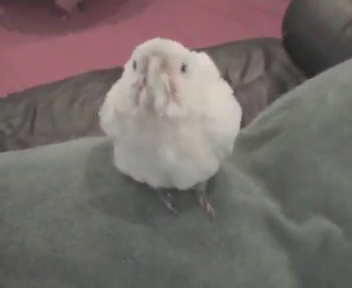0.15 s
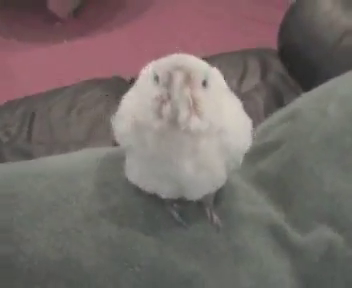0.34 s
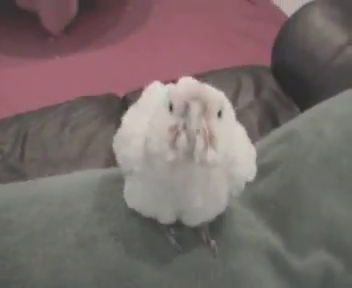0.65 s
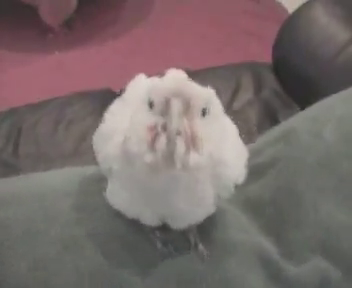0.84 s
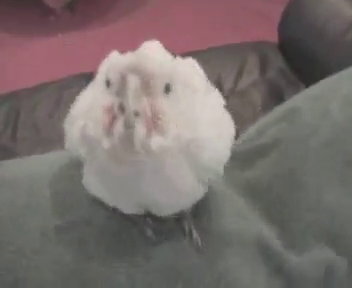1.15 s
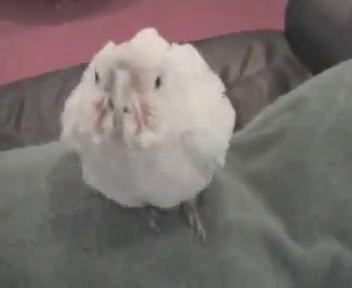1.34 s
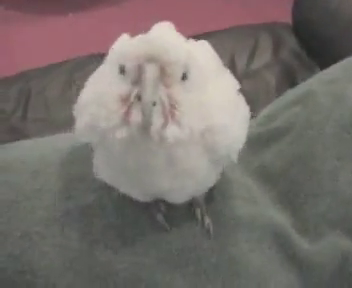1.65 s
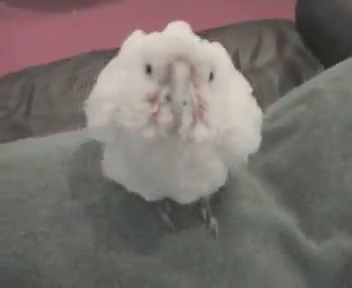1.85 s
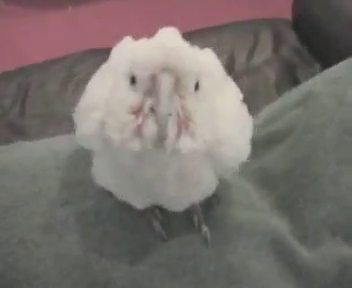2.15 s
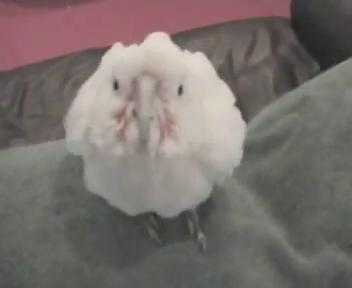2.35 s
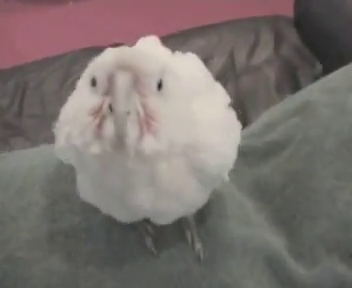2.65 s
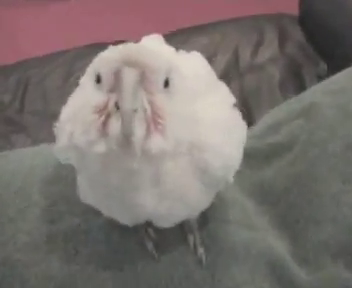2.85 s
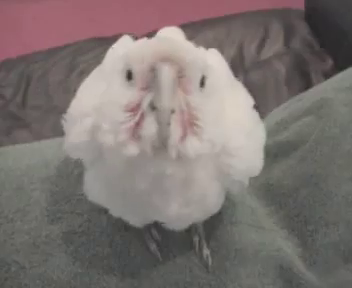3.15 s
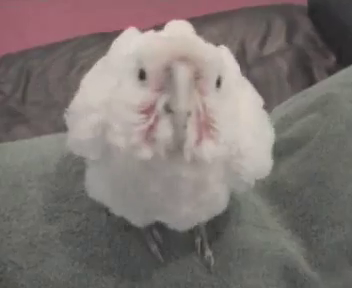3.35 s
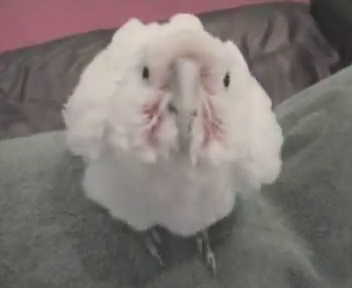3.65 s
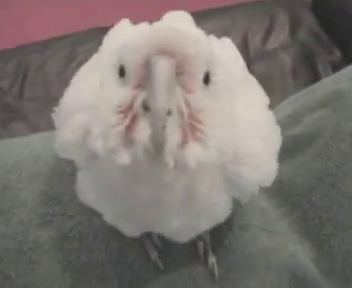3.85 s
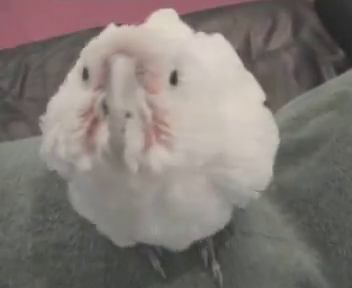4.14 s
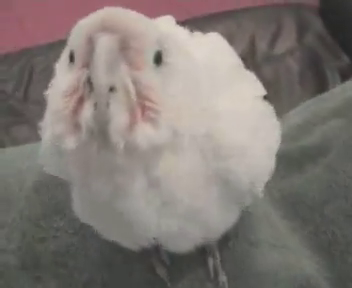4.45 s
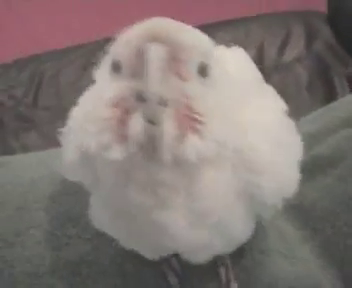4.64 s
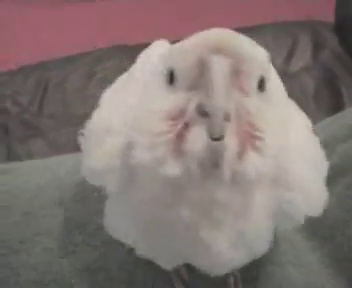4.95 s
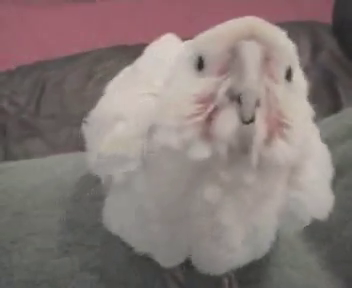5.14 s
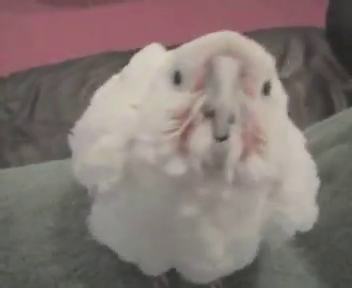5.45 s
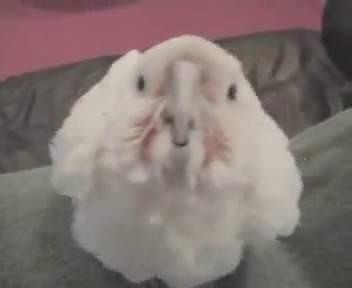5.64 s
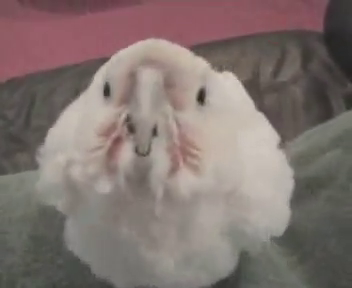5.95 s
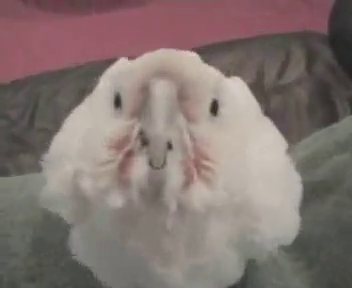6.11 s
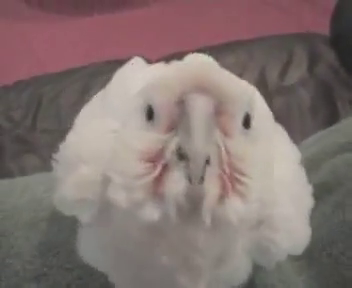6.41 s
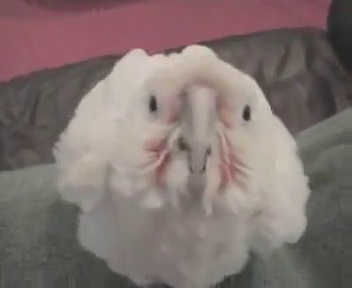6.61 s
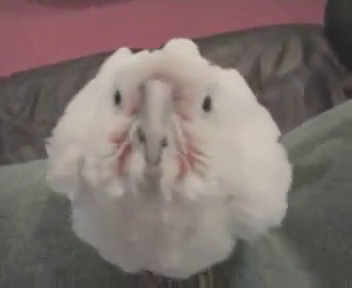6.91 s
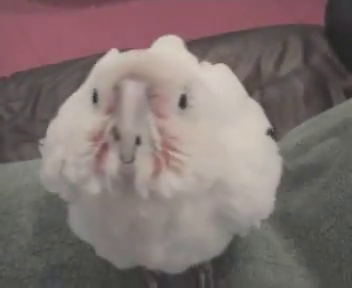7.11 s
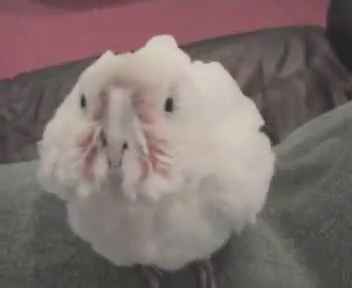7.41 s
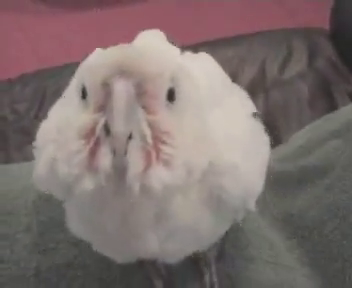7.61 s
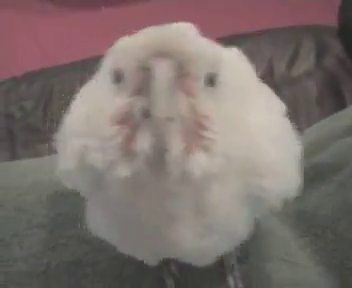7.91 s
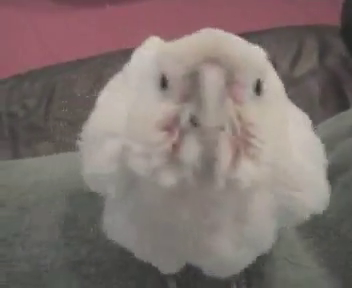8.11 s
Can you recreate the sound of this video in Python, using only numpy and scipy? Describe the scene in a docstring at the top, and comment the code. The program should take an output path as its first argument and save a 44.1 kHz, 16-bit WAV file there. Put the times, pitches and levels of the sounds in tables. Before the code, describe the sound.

Four raspy, grating parrot calls, growing louder and longer, with short squeaks at their edges, in a soft quiet room with machine whirr.

```python
"""A young cockatoo begs in harsh rasps close to a tape camcorder in a soft, quiet room. Each rasp is a train of
sharp syrinx pulses filtered by windpipe and beak; it sputters, stalls, and starts or ends in a squeak of
clean partials. Under it: motor noise and gear tones, ticks of a head drum, a very high whine (sines),
dull knocks on the casing (decaying sines) and a faint room tail (decaying noise)."""
import sys
import numpy as np
from scipy import signal
from scipy.fft import rfft, irfft, next_fast_len
from scipy.io import wavfile
from scipy.ndimage import uniform_filter1d, map_coordinates

SR = 44100
rng = np.random.default_rng(int(sys.argv[2]) if len(sys.argv) > 2 else 0)


def pcm_store(signal):
    """Save signal as 16-bit PCM."""
    levels = np.round(np.clip(np.atleast_2d(signal), -1, 1) * 32767)
    wavfile.write(sys.argv[1], SR, levels.astype(np.int16).T)


N = 364707


def amp(db):
    """Amplitude of a level in dB."""
    return 10 ** (np.asarray(db) / 20)


def unit(x):
    """x scaled to RMS 1."""
    return x / np.sqrt(np.mean(x ** 2) + 1e-20)


def along(points, hz):
    """(frequency, value) points interpolated on a log frequency axis."""
    f, v = np.transpose(points)
    return np.interp(np.log(hz + 1), np.log(f + 1), v)


def read(rows, t):
    """Each column after the time, interpolated at the times t."""
    s, *cols = np.transpose(rows)
    return [np.interp(t, s, c) for c in cols]


def wobble(rate_hz):
    """Smooth random curve with rate_hz random knots a second."""
    return map_coordinates(rng.standard_normal(int(N * rate_hz / SR) + 4), [np.arange(N) * rate_hz / SR])


def filtered(x, response):
    """x times a zero-phase response of frequency."""
    m = next_fast_len(N + 8192)
    return irfft(rfft(x, m) * response(np.fft.rfftfreq(m, 1 / SR)), m)[..., :N]


def room(x):
    """Soft room: cushions leave only a short tail of decaying noise."""
    t60_s, delay_samples = .29, 100
    t = np.arange(SR // 4) / SR
    tail = rng.standard_normal(len(t)) * amp(-60 * t / t60_s)
    return signal.fftconvolve(np.pad(x, (delay_samples, 0)), tail / np.linalg.norm(tail))[:N]


# motor noise spectrum, common part: (frequency [Hz], relative density [dB])
HUM_MID = [(15, -50), (25, -12), (60, -4), (213, -2.5), (363, -6), (529, -7.5), (879, -5.5), (1210, -3.5),
           (1630, -16.5), (1960, -6.5), (2430, -14), (3260, -11.5), (3540, -13), (4380, -8.5), (6370, -13),
           (15000, -30)]
# motor noise spectrum, left-right part: (frequency [Hz], relative density [dB])
HUM_SIDE = [(15, -48), (25, -14), (118, 0.5), (811, -3), (952, -1.5), (4040, -17.5), (4500, -26),
            (8780, -3.5), (10600, -16), (15000, -19.5)]
# whirr: (time [s], level before flutter [dB])
WHIRR = [(0, -57.5), (.15, -68), (1.4, -63), (2.4, -61.5), (3.6, -64.5), (7.55, -67.5), (7.7, -59.5),
         (8.27, -64.5)]
# narrow hiss near 1.4 kHz that fades early: (time [s], level [dB])
DRONE = [(0, -60), (.25, -62.5), (.5, -72), (8.27, -76)]


def motor_hiss():
    """Motor noise as mid and side: shaped broadband hiss, a fluttering whirr band and a narrow drone."""
    noise = rng.standard_normal((4, N))
    t = np.arange(N) / SR
    hum = amp(-59) * unit(filtered(noise[0], lambda hz: amp(along(HUM_MID, hz))))
    side = amp(-63) * unit(filtered(noise[1], lambda hz: amp(along(HUM_SIDE, hz))))
    whirr = unit(filtered(noise[2], lambda hz: 1 / (1 + ((hz - 4650) / 350) ** 2)))
    drone = unit(filtered(noise[3], lambda hz: 1 / (1 + ((hz - 1400) / 150) ** 2)))
    mid = hum * amp(2.4 * wobble(3.3))
    mid += whirr * amp(read(WHIRR, t)[0] + 2.1 * wobble(12))
    mid += drone * amp(read(DRONE, t)[0])
    return mid, side


# gear tones: (frequency [Hz], width of wander [Hz], level before flicker [dB])
GEARS = [(102, 10, -77), (1258, 6, -72), (3371, 5, -78), (4320, 50, -70), (4496, 10, -66), (5035, 40, -73),
         (5240, 20, -75)]


def gear_tones():
    """Sines that wander in pitch and flicker in level."""
    tones = np.zeros(N)
    for hz, width_hz, db in GEARS:
        flicker = amp(db + 3 * wobble(9))
        phase = 2 * np.pi * np.cumsum(hz + width_hz / 2 * wobble(28)) / SR
        tones += np.sqrt(2) * flicker * np.sin(phase)
    return tones


TICK_HZ, FIRST_TICK_S = 59.94, .018


def half_turns(t):
    """Drum position in half turns."""
    return (t - FIRST_TICK_S) * TICK_HZ


# ticks of the drum's two heads: (time [s], louder head before scatter [dB], first over second [dB])
DRUM = [(.3, -52, 0), (1.5, -50, 9), (2, -53, 17), (3.7, -50, -17), (5.9, -50, 7), (7.6, -52.5, 12),
        (8.2, -51, 9)]


def drum_ticks():
    """One head ticks each half turn: a short decaying ring, the heads unequal."""
    t60_s, rise_s, ring_hz, scatter_db = .019, .00037, 1935, 2.5
    t = np.arange(N) / SR
    turn = half_turns(t)
    since = turn % 1 / TICK_HZ
    head = np.floor(turn).astype(int)
    scatter = scatter_db * rng.standard_normal(head[-1] + 2)[head + 1]
    loud_db, lead_db = read(DRUM, t)
    strength = loud_db + np.minimum((-1.) ** head * lead_db, 0) + scatter
    envelope = amp(strength - 60 * since / t60_s) * (1 - np.exp(-since / rise_s))
    return envelope * np.sin(2 * np.pi * ring_hz * since)


# whine: (time [s], level [dB], left over right [dB])
WHINE = [(0.0, -76, -1), (0.23, -68, -5.5), (0.78, -67, 3.5), (1.01, -72, -11.5), (1.15, -81, 6.0),
         (2.02, -69, 10.0), (2.42, -78, 8.0), (2.58, -76, -9.0), (2.85, -65, 4.0), (3.45, -87, 0.0),
         (3.59, -69, 8.5), (4.08, -69, -20), (5.34, -83, 5.5), (6.2, -64, -0.5), (6.79, -75, -1.0),
         (7.67, -62, -3.0), (8.04, -73, -8.5), (8.27, -83, 4.5)]


def whine():
    """High sine, wavering unlike left and right, throbbing once each half turn of the drum."""
    whine_hz, port_phase_rad = 15673, np.array([[.6], [-.6]])
    t = np.arange(N) / SR
    level_db, pan_db = read(WHINE, t)
    level = amp(level_db + np.array([pan_db, -pan_db]) / 2)
    throb = 1 + .2 * np.cos(2 * np.pi * half_turns(t))
    return np.sqrt(2) * level * throb * np.sin(2 * np.pi * whine_hz * t + port_phase_rad)


def camcorder():
    """The machine's own noise, motors, gears and drum ticks in the middle and hiss in stereo, plus a high
    whine."""
    mid, side = motor_hiss()
    mid = mid + gear_tones() + drum_ticks()
    return np.array([mid + side, mid - side]) + whine()


# the hand shifts on the casing: (time [s], level before side gain [dB], frequency [Hz])
THUMPS = [(0.015, -48, 300), (0.062, -42.5, 295), (0.64, -32.5, 305), (3.264, -40, 298),
          (7.958, -41.5, 298)]


def thumps():
    """Dull knocks through the casing: decaying sines, opposite in polarity left and right."""
    t60_s, side_gain = .025, np.array([[2.5], [-2.5]])
    out, t = np.zeros(N + SR), np.arange(SR // 20) / SR
    for s, db, hz in THUMPS:
        out[round(s * SR):][:len(t)] += amp(db - 60 * t / t60_s) * np.sin(2 * np.pi * hz * t)
    return out[:N] * side_gain


# clean squeaks: (time at inner end, at or nearer a rasp [s], time at free end [s], frequency at inner end [Hz],
# at free end [Hz], levels at inner end before fades: first partial [dB], second [dB], third [dB])
SQUEAKS = [(.31, .264, 890, 740, -50, -57, -62), (1.255, 1.35, 1058, 1090, -45.5, -52, -47),
           (2.55, 2.526, 1340, 1360, -48, -50, -56), (3.435, 3.498, 1212, 1185, -45, -42.5, -39.5),
           (4.344, 4.236, 1340, 960, -41, -47, -50), (5.752, 5.822, 1090, 1068, -41, -42.5, -36),
           (6.427, 6.396, 1070, 820, -39, -43, -45), (7.504, 7.535, 1085, 990, -43, -45, -46)]
# higher partials re the third: (frequency [Hz], level [dB])
UPPER = [(3500, -16), (4300, -14), (4800, -7), (5400, -14), (6200, -28), (6750, -9), (7200, -26)]


def squeaks():
    """Membranes swing freely: clean partials; the windpipe picks among those above the third."""
    bend = 2.2  # curvature of the glide
    fade_db, fade_s, settle_s = 18, .015, .005
    thin_db_per_s, lead_share = [65, 190, 320], .35  # a squeak leading into a rasp thins by this share
    out = np.zeros(N)
    for joined, free, joined_hz, free_hz, *levels in SQUEAKS:
        i = np.arange(int(min(joined, free) * SR), int(max(joined, free) * SR))
        t = i / SR
        away = np.clip((t - joined) / (free - joined), 0, 1)
        hz = joined_hz + (free_hz - joined_hz) * away ** bend
        fade = fade_db * np.clip(1 - np.abs(t - free) / fade_s, 0, 1)
        apart = np.abs(t - joined)
        share = lead_share if free < joined else 1
        db = [level - thin * apart * share - fade for level, thin in zip(levels, thin_db_per_s)]
        # overtones settle in after a rasp
        settle = fade_db * np.clip(1 - apart / settle_s, 0, 1) * (free > joined)
        db[1:] = [v - settle for v in db[1:]]
        db += [db[2] + along(UPPER, k * hz) for k in range(4, 6)]
        phase = 2 * np.pi * np.cumsum(hz) / SR
        partials = sum(amp(v) * np.sin((k + 1) * phase) for k, v in enumerate(db))
        out[i] = np.sqrt(2) * signal.windows.tukey(len(i), .1) * partials
    return out


# airway resonances, beak shut, before stretch and lift: (frequency [Hz], width [Hz], relative level [dB])
SHUT = [(800, 800, -11), (1700, 540, -2), (2430, 520, -13), (3700, 510, -13.5), (4450, 320, -5),
        (6370, 710, -16), (7260, 465, 7)]
# airway resonances, beak ajar, before stretch: (frequency [Hz], width [Hz], relative level [dB])
OPEN = [(730, 990, -12), (1700, 450, -6.5), (2460, 427, 2), (3590, 880, -4), (4973, 320, 2),
        (6600, 1300, -4), (7800, 360, -18), (10500, 450, 3), (13200, 450, -12)]
# airway resonances, beak wide, before stretch: (frequency [Hz], width [Hz], relative level [dB])
WIDE = [(810, 890, -7.5), (1650, 900, -11.5), (2702, 520, 3), (3730, 730, -2), (4946, 380, -2),
        (6460, 900, -15.5), (7650, 730, -10), (10300, 540, -15.5), (13300, 280, -13.5)]
# spectrum of one syrinx pulse: (frequency [Hz], relative level [dB])
PULSE = [(60, -35), (250, -9), (500, -1.5), (1000, 0.5), (1300, -5.5), (1600, 0), (5300, 3.5), (6500, -11),
         (9000, -24.5), (16000, -14)]


def tract(beak, stretch=1, size=2048):
    """Causal airway answer, energy 1, to one pulse. The mouth is a side cavity: its notch climbs as the beak
    parts, and below the notch the airway already sounds open."""
    f = np.fft.rfftfreq(size, 1 / SR)

    def resonances(modes, lift=1):
        return sum(amp(2 * db) / (1 + (2 * (f - c * stretch * lift) / w) ** 2) ** 1.16 for c, w, db in modes)

    shut, ajar, wide = resonances(SHUT, 1 + .12 * beak), resonances(OPEN), resonances(WIDE)
    ajar = ajar * (1 - .82 / (1 + ((f - 3500 * stretch) / 600) ** 2))  # hollow between the two main bands
    notch_hz = 3050 * 2.25 ** beak
    below = 1 / (1 + (f / notch_hz) ** 16)
    opened = ajar + max(beak - 1, 0) * (wide - ajar)
    power = below * opened + (1 - below) * shut * amp(-40 * beak)
    power *= 1 - .985 / (1 + ((f - notch_hz) / (.12 * notch_hz)) ** 2)
    # minimum phase by folding the cepstrum
    cep = irfft(np.log(power) / 2 + np.log(amp(along(PULSE, f))))
    cep[1:size // 2] *= 2
    cep[size // 2 + 1:] = 0
    h = irfft(np.exp(rfft(cep)))[:size // 2]
    return h / np.linalg.norm(h)


# lone syrinx pulses: (time [s], peak level [dB])
TICKS = [(0.2665, -33.5), (0.3317, -40), (0.341, -36), (0.3655, -29), (2.4943, -27.5), (2.5017, -39),
         (3.8608, -35.5)]


def lone_pulses():
    """Single pulses through the shut beak."""
    train, click = np.zeros(N), tract(0)
    for s, db in TICKS:
        train[round(s * SR)] = amp(db) / np.abs(click).max()
    return signal.fftconvolve(train, click)[:N]


def loudness(t, rasp):
    """Rasp level in dB: a swell to its peak, then a fall that steepens."""
    start_db, end_db = -42.5, -36
    t0, t1, peak_s, peak_db, rise, fall, _ = rasp
    before = np.clip((peak_s - t) / (peak_s - t0), 0, 1)
    after = np.clip((t - peak_s) / (t1 - peak_s), 0, 1)
    return peak_db - (peak_db - start_db) * before ** rise - (peak_db - end_db) * after ** fall


# slow pulses that speed up: (start [s], end [s], cycle rate from [Hz], to [Hz])
CREAKS = [(.47, .69, 155, 245), (2.6, 2.762, 120, 220), (4.51, 4.78, 150, 265), (4.76, 4.89, 170, 290),
          (6.525, 6.618, 195, 250)]
# the rasp locks to a clear pitch: (start [s], end [s], cycle rate from [Hz], to [Hz])
CLEARS = [(5.135, 5.24, 352, 347), (5.47, 5.516, 350, 350), (6.63, 6.68, 336, 343)]
# the first rasp settles to a low growl: (time [s], cycle rate [Hz], roughness [0-1])
GROWL = [(.665, 160, .27), (.75, 177.5, .09), (.794, 175.2, .1), (.854, 186.3, .06), (.906, 181.4, .04),
         (.932, 184.9, .13), (1.01, 178, .13), (1.134, 146, .1), (1.2, 134, .2), (1.26, 130, .4)]


def syrinx(t, rasp, plain):
    """Cycle rate, second pulse and roughness: rasping that tires, overlaid by creaks, clear spells and growl."""
    rasp_hz, sag_hz_per_s, tired_rough = 345, 300, .82
    rasp_second, growl_second = .78, .88  # size of the second pulse in a cycle
    creaking, cleared = (.14, .37), (.78, .12)  # (second pulse, roughness)
    slide_s, snap_s = .04, .012  # creaks and growl set in slowly, other changes are quick
    flat = 0 * t
    tired = np.clip(t - rasp[6], 0, None)
    roughness = plain + (tired_rough - plain) * tired / (rasp[1] - rasp[6])
    state = np.array([rasp_hz - sag_hz_per_s * tired, rasp_second + flat, roughness])
    spells = [(row, creaking, slide_s) for row in CREAKS] + [(row, cleared, snap_s) for row in CLEARS]
    for (a, b, *hz), (second, rough), onset_s in spells:
        share = np.clip(np.minimum((t - a) / onset_s, (b - t + snap_s / 2) / snap_s), 0, 1)
        spell = np.array([np.interp(t, [a, b], hz), second + flat, rough + flat])
        state = state + share * (spell - state)
    hz, rough = read(GROWL, t)
    share = np.clip((t - GROWL[0][0]) / slide_s + .5, 0, 1) * (t < GROWL[-1][0])
    return state + share * (np.array([hz, growl_second + flat, rough]) - state)


# the longest silences: (last pulse [s], next pulse [s])
STALLS = [(.4177, .4568), (.4797, .4904), (2.5807, 2.5941), (2.5975, 2.6079), (2.8152, 2.8239),
          (2.8504, 2.867), (2.8748, 2.8825), (2.9827, 2.9909), (3.1798, 3.1899), (3.2646, 3.2823),
          (3.29, 3.2978), (3.326, 3.3356), (3.34, 3.3494), (3.3558, 3.3703), (3.3768, 3.3865),
          (4.3542, 4.3656), (4.3656, 4.4034), (4.4034, 4.4185), (4.4185, 4.4258), (4.454, 4.4633),
          (4.5088, 4.5157), (4.5312, 4.5463), (4.5463, 4.5555), (4.7418, 4.7484), (4.7604, 4.7673),
          (5.0772, 5.0882), (5.1284, 5.1347), (5.3695, 5.3758), (5.4412, 5.4498), (5.5473, 5.5572),
          (5.6027, 5.613), (6.4343, 6.4496), (6.457, 6.4635), (6.4663, 6.4799), (6.4827, 6.4914),
          (6.5168, 6.5237), (6.5266, 6.5348), (6.663, 6.6698), (6.6837, 6.6996), (6.7985, 6.807),
          (7.0584, 7.0687), (7.396, 7.4067)]


def stalls(when, rough, t0, t1):
    """Gaps where the membranes stall: the listed long ones plus short chance ones, likelier when rough."""
    chance = rng.random((len(when), 2))
    brief = chance[:, 0] < 2.2 * np.clip(rough - .36, 0, 1) ** 2
    gaps = [(a, a + .0026 + .004 * u ** 2) for a, u in zip(when[brief], chance[brief, 1])]
    # a burst parts two stalls
    gaps = [g for g, before in zip(gaps, [(0, 0)] + gaps) if before[1] + .002 < g[0] and g[1] < t1]
    long = [g for g in STALLS if t0 <= g[0] < t1]
    return long + [(a, b) for a, b in gaps if all(b < c - .003 or a > d + .004 for c, d in long)]


def pulses(rasp, plain):
    """Times and sizes of one rasp's pulses: two a cycle, scattered by roughness, cut by stalls."""
    t0, t1 = rasp[:2]
    t = np.arange(t0, t1, 1 / SR)
    pace_hz, _, shake = syrinx(t, rasp, plain)
    turns = np.cumsum(pace_hz * np.exp(.7 * shake ** 2 * wobble(90)[:len(t)])) / SR
    half = np.arange(0, turns[-1], .5)
    when = np.interp(half, turns, t)
    hz, second, rough = syrinx(when, rasp, plain)
    draw = np.clip(rng.standard_normal((len(half), 2)), -1.7, 1.7)
    weak = np.arange(len(half)) % 2 == 1
    # the second pulse comes early
    when = when + (.2 * np.clip(rough, 0, 1) * draw[:, 0] - .065 * weak) / hz
    size = np.where(weak, np.clip(second, 0, 1), 1) * amp((.4 + 3.5 * rough) * draw[:, 1])
    gaps = stalls(when, rough, t0, t1)
    for a, b in gaps:
        size[(when > a - .0008) & (when < b + .0012)] = 0
    # the membranes slap hard as they stall, and restart more gently
    edges = np.reshape(gaps, (-1, 2))
    slap = amp([3.5, 0] + 1.5 * rng.standard_normal(edges.shape))
    for a, b in gaps:
        slap[(edges > a) & (edges < b)] = 0
    return np.append(when, edges), np.append(size, slap)


# extent of each rasp: (start [s], end [s])
SPANS = [(.404, 1.25), (2.545, 3.423), (4.34, 5.747), (6.424, 7.501)]
# swell of each rasp: (peak time [s], peak level [dB], curvature of rise, of fall, time it starts to tire [s])
SWELLS = [(.8, -30.5, 3.5, 2.7, 1.2), (3.08, -28, 2.2, 1.33, 3.08), (5.15, -23.5, 1.9, 2.27, 5.52),
          (6.82, -24, 4.5, 4.9, 7.47)]
# plain rasping of each rasp: roughness [0-1]
ROUGH = [.55, .58, .48, .5]
# airway resonances of each rasp: frequency factor [ratio]
STRETCH = [1.037, 0.998, 0.992, 0.995]
# beak in each rasp: (starts to part [s], ajar [s], starts to widen [s], wide [s],
# opening at start, when wide, at end [0 shut, 1 ajar, 2 wide])
BEAK = [(0.461, 0.497, 0.635, .95, 0.018, 1.9, 1.68), (2.617, 2.682, 2.74, 2.9, 0.094, 1.34, 1.63),
        (4.558, 4.65, 4.88, 4.92, 0.12, 1.88, 1.94), (6.462, 6.515, 6.5, 6.54, 0.34, 1.85, 1.72)]


def rasps():
    """Pulse trains through an airway that changes as the beak opens."""
    parted, ajar, ready = .066, .76, .9  # opening gained before parting; when ajar; before widening
    steps = [0, .12, .25, .4, .55, .7, .85, 1, 2]
    lead_s, smooth_s = .05, .06
    out, offsets = np.zeros(N), np.arange(-8, 8)
    for (t0, t1), swell, plain, stretch, beak_row in zip(SPANS, SWELLS, ROUGH, STRETCH, BEAK):
        *moves, first, wide, last = beak_row
        rasp = (t0, t1, *swell)
        when, size = pulses(rasp, plain)
        move_s = np.maximum.accumulate([t0, *moves, t1])
        opening = np.interp(when, move_s, [first, first + parted, ajar, ready, wide, last])
        at = (when - t0 + lead_s) * SR
        cell, count = at.astype(int), int((t1 - t0 + .1) * SR)
        # level the train's power, then apply the swell
        density = uniform_filter1d(np.bincount(cell, size ** 2, count), int(smooth_s * SR))
        size = size * amp(loudness(when, rasp)) / np.sqrt(np.abs(density[cell]) + 1e-9)
        # windowed sinc places pulses between samples
        d = offsets - (at - cell)[:, None]
        kernel = np.sinc(d) * np.cos(np.pi * d / 18) ** 2
        tremble = .15 * wobble(14)[cell] * (opening > 1.15)  # an open beak is never still
        tremble = tremble + .06 * rng.standard_normal(len(when))  # airway differs pulse to pulse
        place = np.interp(opening + tremble, steps, range(len(steps)))
        for k, beak in enumerate(steps):  # each pulse sounds through the two nearest beak shapes
            share = np.clip(1 - np.abs(place - k), 0, 1)
            weights = kernel * (size * share)[:, None]
            train = np.bincount((cell[:, None] + offsets).ravel(), weights.ravel(), count)
            sound = signal.fftconvolve(train, tract(beak, stretch))[:count]
            out[int((t0 - lead_s) * SR):][:count] += sound
    return out


# half the left-right difference of the bird, re its mid: (frequency [Hz], level [dB])
LEAN = [(100, -13), (250, -21), (600, -23.5), (1200, -26), (2500, -107), (6000, -102)]


def scene():
    """Bird leaning left in the lows, its faint room tail, casing knocks, the camcorder's own noise and a high
    whine."""
    bird = rasps() + lone_pulses() + squeaks()
    lean = filtered(bird, lambda hz: amp(along(LEAN, hz)))
    direct = np.array([bird + lean, bird - lean])
    return direct + amp(-21) * room(bird) + thumps() + camcorder()


def record(dry):
    """The recorder keeps nothing above its band limit."""
    top_hz = 15900
    return filtered(dry, lambda hz: hz < top_hz)


dry = scene()
out = record(dry)
pcm_store(out)
```